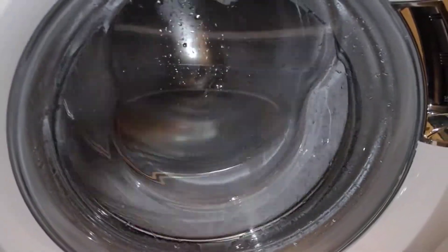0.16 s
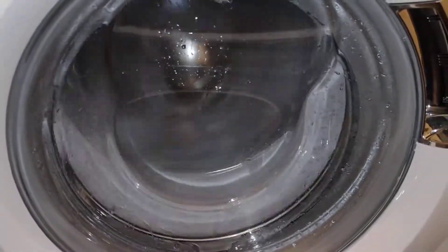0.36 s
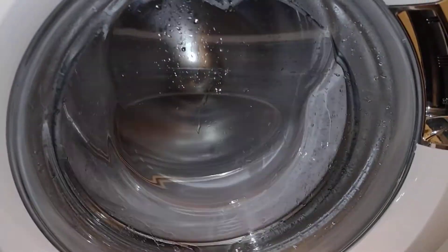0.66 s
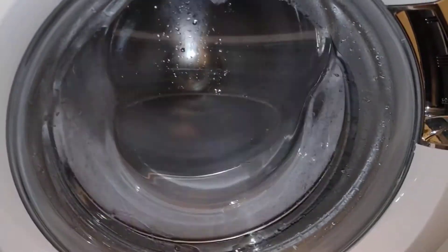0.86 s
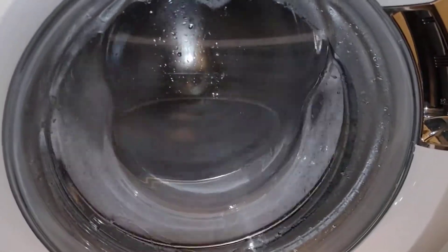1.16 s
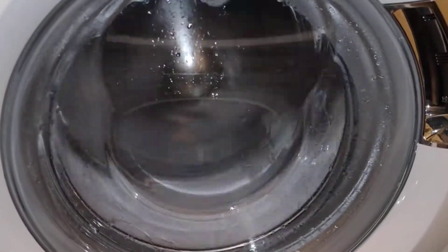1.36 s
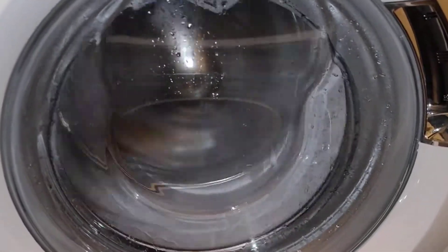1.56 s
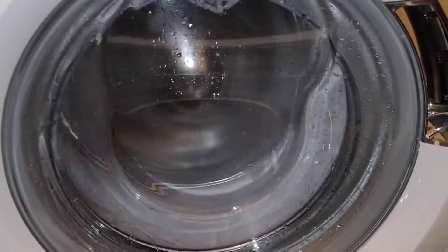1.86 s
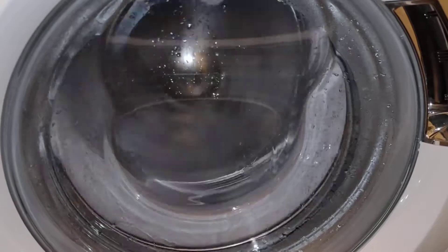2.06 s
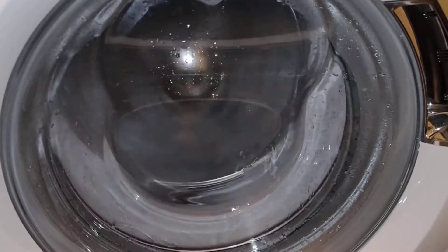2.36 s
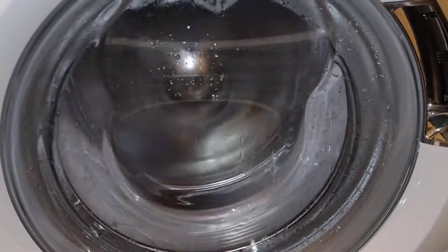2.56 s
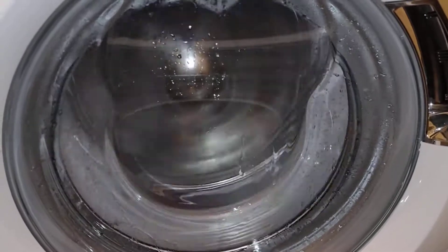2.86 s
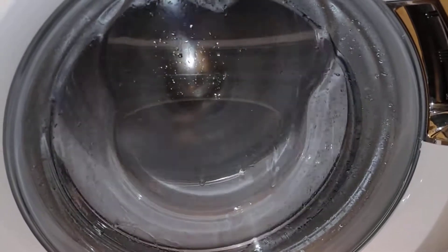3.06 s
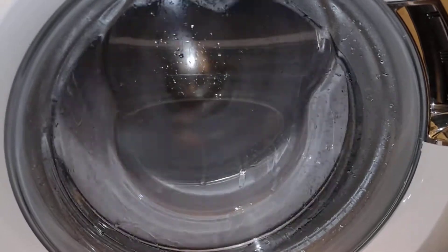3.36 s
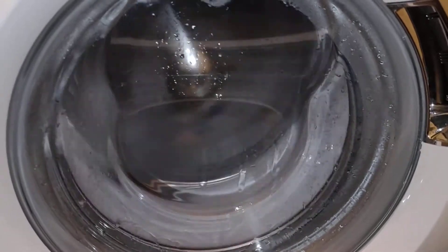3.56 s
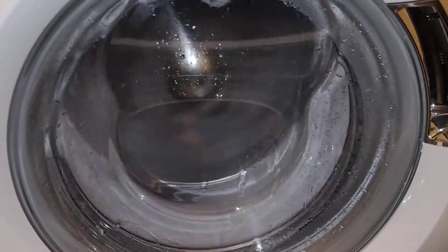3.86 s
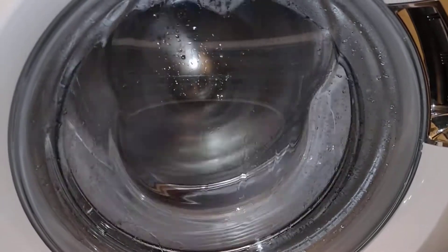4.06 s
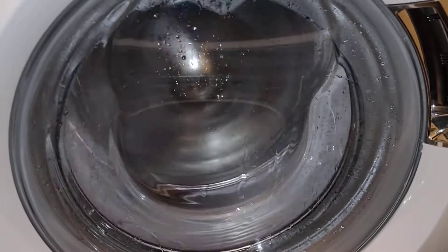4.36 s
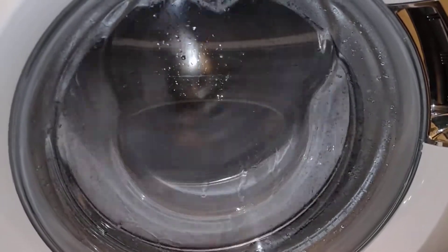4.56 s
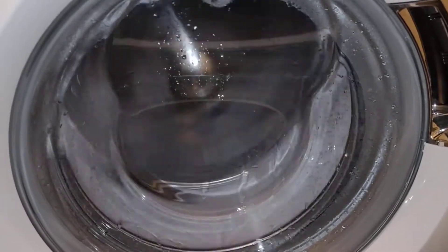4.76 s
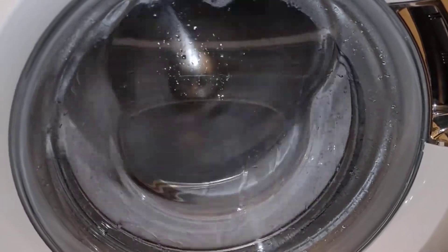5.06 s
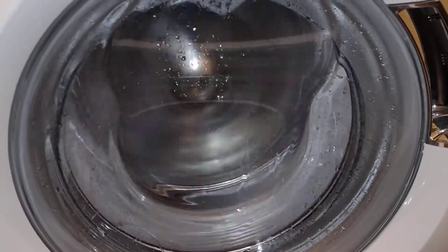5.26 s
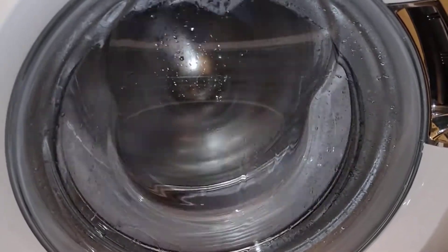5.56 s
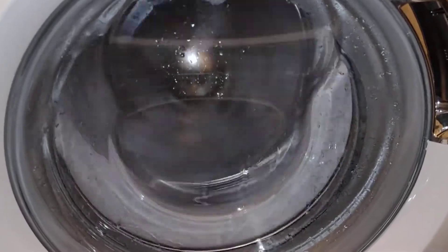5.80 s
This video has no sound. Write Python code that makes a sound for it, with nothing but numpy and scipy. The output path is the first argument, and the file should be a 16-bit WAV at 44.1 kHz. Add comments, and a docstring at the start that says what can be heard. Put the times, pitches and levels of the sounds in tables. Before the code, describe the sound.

A front-loading washing machine's motor whine climbs to a spin, overshoots slightly and holds, over low rumble, rapid drum throb and growing water spray.

```python
"""Washing machine reaching its spin

A washing machine runs up to a 400 rpm spin, overshoots a little and settles. Its brush motor whines as sums of
sine waves and hisses as coloured noise; the unbalanced load makes the pitch wobble once a turn, thumps the tub
and swishes. Most sounds grow with speed; drum and cabinet drone, rumble and boom, and the mains hums.
As the laundry lets go of its water, the spray (noise and ringing drops) grows and its surges get more even.
Now and then water sloshes or the load knocks and thuds."""
import sys
import numpy as np
from scipy import signal
from scipy.fft import rfft, irfft, next_fast_len
from scipy.io import wavfile
from scipy.ndimage import uniform_filter1d

SR = 44100
rng = np.random.default_rng(int(sys.argv[2]) if len(sys.argv) > 2 else 0)


def to_wav(s):
    """Save 16-bit WAV."""
    ch = np.atleast_2d(s).T  # columns
    pcm = np.round(np.clip(ch, -1, 1) * 32767)  # PCM
    wavfile.write(sys.argv[1], SR, pcm.astype(np.int16))


N = 261513

# In every table of resonances and nulls the lift is halved one width away from the centre.
# In every noise colour only the shape counts: the noise is scaled to rms 1 afterwards.

# two opposite shoves a turn: multiple of the drum rate, level/dB
THUMP = [(5, -38), (7, -16), (9, -1), (11, -5), (13, -15.5)]
# drum and bearing tones: multiple of the drum rate, level/dB
DRONE = [(19, -13), (20, -23), (21, -25), (22, -19), (23, -23), (24, -17), (26, -22.5), (27, -12),
         (33, -15.5), (36, -20.5), (38, -22), (45, -19), (48, -21), (50, -16.5)]
# chopped mains current in the motor: f/Hz, level/dB (before HUM_LAW)
HUM = [(100, -17), (200, -16.5), (300, -12), (400, -23)]
# its higher lines at the hardest pull: f/Hz, level/dB
PULL_BUZZ = [(500, -44), (600, -51), (700, -54), (900, -54)]
# noise colours: f/Hz, relative level per Hz/dB
RUMBLE = [(20, -38), (35, -19), (55, -2), (95, 3.5), (130, 9.5), (180, 4.5), (215, 1.5), (285, 5.5),
          (335, 4.5), (360, -37), (600, -76)]
SWISH = [(200, -17), (380, -5), (440, -0.5), (560, -4), (670, -6.5), (780, 1.5), (900, -2), (1000, -6.5),
         (1270, -9.5), (1520, -27), (2000, -20), (2500, -23), (3300, -46)]
SPRAY = [(900, 8), (1300, 15.5), (1520, -3), (1700, 9), (1950, 7.5), (2300, 7.5), (2800, 13), (3300, 3),
         (4300, 9), (6000, -10), (15000, -22)]
BRUSH = [(1500, 1.5), (2400, 1), (3400, -61), (4500, -18), (5400, 11), (6050, -3.5), (6700, 7.5),
         (7800, 11.5), (8600, 7.5), (9700, 13.5), (10700, 13), (11800, 4.5), (13300, 12.5), (14700, 2),
         (15700, -7)]
# how alike the noise is at the two ears: f/Hz, correlation (-1 to 1)
LIKENESS = [(110, 1), (150, 0.4), (300, 0.9), (600, 0.36), (1200, -0.13), (4000, 0), (15000, -0.11)]
# left against right for the noise: f/Hz, level/dB
BALANCE = [(40, -5), (150, -3.5), (320, -6.5), (420, 4.5), (900, -3), (2000, 1.5), (14000, -0.5)]
# commutator overtones: multiple of the slot rate, level/dB (before BAR_LAW)
BAR_TONES = [(6, -7), (8, -9.5), (10, -12.5), (12, -16), (14, -14)]
# rotor slot tones: multiple of the slot rate, level/dB (before SLOT_LAW)
SLOT_TONES = [(3, -23), (5, -7), (7, -10), (9, -11.5), (11, -11), (13, -12)]
# resonances and nulls of the motor housing: f/Hz, width/Hz, lift/dB
HOUSING = [(3230, 150, 12.5), (4027, 18, 15), (5810, 470, -1), (8110, 30, -1), (9300, 2300, 7),
           (9270, 57, 2.5), (10540, 30, -2), (10700, 31, 0.5)]
# rough low tones of the motor bearings: multiple of the motor rate, level/dB (at set speed)
GROWL = [(6, -50), (7, -56)]
# booms of the cabinet panels: f/Hz, width/Hz, lift/dB
PANEL = [(136.4, 1.1, 10), (161.7, 2.5, 7)]
# cabinet resonances and nulls that the main whine and its octave pass: f/Hz, width/Hz, lift/dB
WHINE_PEAKS = [(2190, 35, 4), (2525, 54, 7.5), (2586, 14, -3), (2685, 66, 6.3)]
OCTAVE_PEAKS = [(4280, 170, 4.9), (5247, 33, 4.2), (5286, 108, 6.9)]
# standing waves move the main whine between the ears as its pitch changes: f/Hz, left-right level/dB
WHINE_PAN = [(2200, 3), (2320, -3), (2500, -2.5), (2560, -5.5), (2625, -5.6), (2685, 2.4)]
# brush hiss over time: t/s, level/dB (before BRUSH_LAW)
HISS_LEVEL = [(0, 5), (0.35, -6), (0.65, 2.5), (0.7, -1), (1.25, -0.5), (1.55, 0.5), (3.12, 0.8), (3.35, 1),
              (5.9, 0.5)]
# water sloshes in the tub: t/s, time to fade to 37 % of the lift/s, swish lift/dB, spray lift/dB
SLOSHES = [(1.076, 0.053, 2.5, 2), (1.956, 0.03, 5, 2), (2.774, 0.028, 3.5, 3), (2.925, 0.33, 2, 3.5),
           (3.25, 0.033, 0.5, 3), (3.395, 0.051, 3, -0.5), (3.642, 0.033, 0.5, 6.5),
           (4.288, 0.11, -2.5, 1.5)]
# resonances and nulls of the cabinet that colour the rumble and the thuds: f/Hz, width/Hz, lift/dB
CABINET_MODES = [(151, 3.5, -17), (251.5, 5.2, 4.5), (291, 5.3, 4.5), (352, 5.7, -0.5)]
# resonances and nulls of the drum and tub, which colour the laundry, spray and knocks: f/Hz, width/Hz, lift/dB
TUB_MODES = [(388, 8.2, 5.5), (432, 5, 3), (525, 22, 3), (613.5, 5.8, 9.5), (789, 10, 3), (882, 8.1, 6.5),
             (1090, 4.7, -7), (1147, 7.2, 6.5), (1200, 15, -4), (1268, 16, 2), (1427, 20, 10.5),
             (1707, 20, 7.5)]
# colour of the boom of a side panel: f/Hz, relative level per Hz/dB
BOOM = [(40, -55), (90, -23), (125, -7), (150, 10.5), (172, 3), (210, -43.5), (500, -75)]
# that boom over time, strongest while the wet load is brought up to speed: t/s, level/dB
BOOM_LEVEL = [(0, -48), (0.5, -44), (0.77, -31.5), (0.9, -39), (1.17, -34), (1.45, -42), (1.63, -38),
              (1.8, -49), (3.1, -55), (3.85, -38), (5.9, -44)]
# the load knocks harder against the drum: t/s, level/dB (before the rise and decay)
KNOCKS = [(1.485, -30.5), (4.145, -25.5), (4.188, -41)]
# colour of a knock: f/Hz, relative level per Hz/dB
KNOCK = [(40, -45), (200, -16), (330, -3), (520, -0.5), (720, -2), (900, 2.5), (1300, -15), (2500, -43),
         (5000, -55)]
# the wet load thuds softly on some turns: t/s, level/dB
THUDS = [(0.22, -34), (0.36, -34), (0.82, -37), (0.9, -45), (1.05, -36), (1.21, -39), (1.35, -41),
         (1.52, -32), (1.8, -39), (1.95, -31.5), (2.12, -41)]
# colour of a thud: f/Hz, relative level per Hz/dB
THUD = [(150, -21), (240, -2), (325, 4), (370, -25), (600, -50)]
# brief dips of all drum and laundry sounds: t/s, time to fade to 37 % of the dip/s, level/dB
LULLS = [(0.142, 0.062, -3.5), (0.46, 0.021, -0.5), (1.43, 0.02, -3), (2.984, 0.07, -0.5)]

# level laws: level at set speed/dB, power of speed that the amplitude follows, change as the water leaves/dB
HUM_LAW = (-37, 0.6, 7.8)
THUMP_LAW = (-41.5, 5.5, -1.5)
DRONE_LAW = (-36.3, 3, 1.3)
RUMBLE_LAW = (-36.5, 0.78, 0.45)
SWISH_LAW = (-37.5, 4, 2.7)
SPRAY_LAW = (-48, 1, 7.55)
BRUSH_LAW = (-36, 1, 0)
WHINE_LAW = (-36, 1, -0.062)
OCTAVE_LAW = (-45, 0.16, 0.35)
BAR_LAW = (-33, 0.66, 1)
SLOT_LAW = (-38.5, 3.3, 0)
# the tub sways on its springs at one drum rate: f/Hz, width/Hz, lift/dB
SWAY = (6.67, 0.29, 2.9)

SLOTS, BELT_RATIO = 18, 196 / 18   # rotor slots, motor turns per drum turn
CUTOFF_HZ = 15800
ROOM_T60_S = 0.4   # time for the reflections to fall by 60 dB
# the speed control closes in on its set speed as a damped swing (motor turns per s)
SET_SPEED, SPEED_SWING = 72.68, 14.55
# when the set speed is first reached, period of the swing, its time constant
REACHED_S, HUNT_PERIOD_S, SETTLE_S = 1.2061, 5.1974, 1.0841
# share by which the motor speeds up and slows on each drum turn
WOBBLE = 0.0031
# the laundry lets go of its water: start, rise time of the spray, time to drain
RELEASE_S, SPRAY_RISE_S, DRAIN_S = 2.37, 0.15, 1.76
# the heavy side of the load comes round: when (part of a turn), rise and decay (turns)
LUNGE_AT, LUNGE_RISE, LUNGE_DECAY = 0.11, 0.19, 0.24
# the swish: its surge on each turn once drained, its random patter
DRAINED_SURGE_DB, PATTER_DB = 1.4, 0.8
# the spray: its surge on each turn with a wet and a drained load, its random unevenness
WET_SPRAY_SURGE_DB, DRAINED_SPRAY_SURGE_DB, SPLASH_DB = 1.3, 0.6, 0.9
# ringing drops: pitch range, cycles to fall by 60 dB, how many at each ear, level against the spray noise
DROP_LOW_HZ, DROP_HIGH_HZ, DROP_CYCLES, DROPS_PER_S, DROP_DB = 1557, 2737, 240, 120, -9.5
KNOCK_RISE_S, KNOCK_DECAY_S = 0.01, 0.057
THUD_HALF_S = 0.023   # from the middle of a thud to 37 % of its height
# brush pressure: swing with each drum turn, random flicker
BRUSH_SWAY_DB, BRUSH_FLICKER_DB = 0.45, 0.3
# roughness of the whine (0-1): when coasting, and added at the hardest pull
COAST_ROUGH, PULL_ROUGH = 0.19, 0.26
# the resonances answer a change of pitch a little late
RING_LAG_S = 0.017


def from_db(db):
    """Decibels to gain."""
    return 10 ** (np.asarray(db) / 20)


def rms_one(x):
    """Scale to rms 1."""
    return x / np.sqrt(np.mean(x ** 2) + 1e-20)


def at_hz(points, hz):
    """Read a table between its points on a log-frequency axis."""
    f, value = np.transpose(points)
    return np.interp(np.log(np.maximum(hz, 1)), np.log(f), value)


def pan(left_db):
    """Left and right gains that keep the total power the same."""
    gains = from_db(np.array([[.5], [-.5]]) * left_db)
    return gains / np.sqrt(np.mean(gains ** 2, axis=0))


def ramp(start_s, length_s):
    """From 0 to 1 in a straight line."""
    return np.clip((np.arange(N) / SR - start_s) / length_s, 0, 1)


def swing(turns, peak_at):
    """One swing a turn, highest at the given part of the turn."""
    return np.cos(2 * np.pi * (turns - peak_at))


def drift(rate):
    """Slow random wandering with spread 1: noise smoothed twice at the given rate in Hz."""
    r = np.exp(-40 * np.pi * rate / SR)   # worked out at every 20th sample
    white = rng.standard_normal(N // 20 + 2002)
    slow = signal.lfilter([1], [1, -2 * r, r * r], white)[2000:]   # skip the filter's start
    return np.interp(np.arange(N) / 20, np.arange(len(slow)), rms_one(slow))


def resonance_db(hz, mode):
    """Lift (or cut, when negative) in dB near one resonance or null."""
    centre, width, db = mode
    return db / (1 + ((hz - centre) / width) ** 2)


def coloured(white, spectrum, modes=()):
    """Two unrelated noises become stereo noise with a colour, resonances and set likeness of the ears; rms 1."""
    size = next_fast_len(N, True)
    hz = np.arange(size // 2 + 1) * SR / size
    colour_db = at_hz(spectrum, hz) + sum(resonance_db(hz, mode) for mode in modes)
    mid, side = rfft(white, size) * from_db(colour_db)
    alike = np.clip(at_hz(LIKENESS, hz), -1, 1)
    ears = np.sqrt(1 + alike) * mid + np.sqrt(1 - alike) * side * [[1], [-1]]
    return rms_one(irfft(ears * pan(at_hz(BALANCE, hz)), size)[:, :N])


def rolling_noise(turns, repeat, size=4096):
    """Part of the noise is a rough track met again on every turn, the rest is new."""
    track = rng.standard_normal((2, size))
    again = np.array([np.interp(turns % 1 * size, np.arange(size), side) for side in track])
    again *= np.sqrt(size * turns[-1] / N)   # same power per Hz as the new part
    share = np.clip(repeat, 0, 1)
    return np.sqrt(share) * again + np.sqrt(1 - share) * rng.standard_normal((2, N))


def taps(per_s, spread_db):
    """Small random contacts of uneven strength, two unrelated streams; rms 1."""
    struck = rng.random((2, N)) < per_s / SR
    sign = rng.choice([-1, 1], (2, N))
    strength_db = spread_db * np.clip(rng.standard_normal((2, N)), -2, 2)
    return rms_one(struck * sign * from_db(strength_db))


def motor_speed():
    """Motor turns per second: a run-up, one overshoot, then a fading swing about the set speed."""
    t = np.arange(N) / SR
    hunting = np.sin(2 * np.pi * (t - REACHED_S) / HUNT_PERIOD_S)
    return SET_SPEED + SPEED_SWING * np.exp(-t / SETTLE_S) * hunting


def rotor_turns(speed, turns, jitter=0.0011):
    """Turns made by the rotor; the load speeds and slows it once a drum turn, with a little random jitter."""
    uneven = 1 + WOBBLE * swing(turns, peak_at=.27) + jitter * drift(rate=65.0)
    return np.cumsum(speed * uneven) / SR


def pull_of(speed):
    """How hard the motor pulls: 0 when it is not speeding up, 1 at the steepest run-up."""
    gain = np.maximum(np.gradient(speed), 0)
    return gain / gain.max()


def level(law, speed, drained):
    """Gain of a source: a power of the speed, shifted as the water leaves the laundry."""
    db, power, drained_db = law
    return from_db(db + drained_db * drained) * (speed / SET_SPEED) ** power


def hum():
    """The motor iron buzzes at multiples of twice the mains rate."""
    t = np.arange(N) / SR
    lines = sum(from_db(db) * np.sin(2 * np.pi * (hz * t + rng.random())) for hz, db in HUM)
    return np.sqrt(2) * lines * pan(left_db=-4)


def pull_buzz(speed, flutter_db=3):
    """While the motor pulls, the chopped current adds higher, unsteady lines to the hum."""
    t = np.arange(N) / SR

    def one_ear():
        """Every line with its own flutter and starting phase."""
        return sum(from_db(db + flutter_db * drift(rate=14)) * np.sin(2 * np.pi * (hz * t + rng.random()))
                   for hz, db in PULL_BUZZ)

    return pull_of(speed) * np.array([one_ear(), one_ear()])


def lulls():
    """Gain of the drum and laundry sounds, which dip briefly now and then."""
    t = np.arange(N) / SR
    return from_db(sum(db * np.exp(-((t - s) / half_s) ** 2) for s, half_s, db in LULLS))


def panel_boom(turns, throb_db=2):
    """A side panel gives a narrow, hollow boom that throbs with the load."""
    boom_db = np.interp(np.arange(N) / SR, *np.transpose(BOOM_LEVEL))
    boom_db = boom_db + throb_db * swing(turns, peak_at=0.45)
    return from_db(boom_db) * coloured(rolling_noise(turns, repeat=0.61), BOOM)


def thuds():
    """The wet load leans on the tub: soft, rounded thuds in the cabinet's upper boom."""
    t = np.arange(N) / SR
    force = sum(from_db(db) * np.exp(-((t - s) / THUD_HALF_S) ** 2) for s, db in THUDS)
    return force * coloured(rng.standard_normal((2, N)), THUD, CABINET_MODES)


def knocks():
    """Soft, cloth-covered blows: bursts of noise coloured by the tub."""
    force = 0
    for s, db in KNOCKS:
        since = np.maximum(np.arange(N) / SR - s, 0)
        force = force + from_db(db) * (1 - np.exp(-since / KNOCK_RISE_S)) * np.exp(-since / KNOCK_DECAY_S)
    return force * coloured(rng.standard_normal((2, N)), KNOCK, TUB_MODES)


def tub(speed, turns, drained, waver_db=2.0, surge_db=1.0, rebound_db=-0.2, grain_db=-4):
    """The load shoves the tub to and fro; drum and bearings drone and rumble through the cabinet."""
    drum_rate = speed / BELT_RATIO
    shoves = sum(from_db(db) * swing(k * (turns - .26), 0) for k, db in THUMP)
    thump = level(THUMP_LAW, speed, drained) * shoves
    drone = 0
    for k, db in DRONE:
        # a tone swells as it climbs through a panel's pitch
        boom_db = sum(resonance_db(k * drum_rate, mode) for mode in PANEL)
        tone_db = db + boom_db + waver_db * drift(rate=3.7)
        drone = drone + from_db(tone_db) * swing(k * turns, rng.random())
    drone = level(DRONE_LAW, speed, drained) * drone
    rolling = rolling_noise(turns, repeat=0.82) + from_db(grain_db) * taps(per_s=90, spread_db=4)
    rumble = level(RUMBLE_LAW, speed, drained) * coloured(rolling, RUMBLE, CABINET_MODES)
    load_db = resonance_db(drum_rate, SWAY) + surge_db * swing(turns, peak_at=0.28)
    load = from_db(load_db + rebound_db * swing(2 * turns, peak_at=0.38))
    return np.sqrt(2) * (thump + load * drone) * pan(left_db=-2.0) + load * rumble


def lunge(turns):
    """The heavy side comes round: a quick rise and a slower fall once a turn; mean 0, spread 1."""
    since = (turns - LUNGE_AT) % 1
    shape = (1 - np.exp(-since / LUNGE_RISE)) * np.exp(-since / LUNGE_DECAY)
    return rms_one(shape - shape.mean())


def drops(count=14):
    """Drops ring briefly at one of several pitches, in unrelated streams at the two ears; rms 1."""
    out = 0
    for hz in np.geomspace(DROP_LOW_HZ, DROP_HIGH_HZ, count):
        r = from_db(-60 * hz / DROP_CYCLES / SR)   # loss per sample
        w = 2 * np.pi * hz / SR
        falls = (rng.random(N) < DROPS_PER_S / count / SR) * rng.standard_normal((2, N))
        out = out + signal.lfilter([0, np.sin(w)], [1, -2 * r * np.cos(w), r * r], falls + 1e-18)
    return rms_one(out)


def laundry(speed, turns, drained, wet_surge_db=1.5, rattle_db=-3, drops_db=0):
    """Wet laundry swishes and rattles past once a turn, more evenly as it drains, and flings drops at the tub."""
    t = np.arange(N) / SR
    surge = lunge(turns)
    surge_db = wet_surge_db * (1 - drained) + DRAINED_SURGE_DB * drained
    spray_surge_db = WET_SPRAY_SURGE_DB * (1 - drained) + DRAINED_SPRAY_SURGE_DB * drained
    wash_db, gush_db = sum(np.outer(lifts_db, np.exp(-((t - s) / half_s) ** 2))
                           for s, half_s, *lifts_db in SLOSHES)
    rubbing = rolling_noise(turns, repeat=0.073) + from_db(rattle_db) * taps(per_s=220, spread_db=0.5)
    water = rng.standard_normal((2, N)) + from_db(drops_db) * taps(per_s=1300, spread_db=3.5)
    swish = level(SWISH_LAW, speed, drained) * coloured(rubbing, SWISH, TUB_MODES)
    released = ramp(RELEASE_S, SPRAY_RISE_S)
    wet_noise = coloured(water, SPRAY, TUB_MODES) + from_db(DROP_DB) * drops()
    spray = level(SPRAY_LAW, speed, released) * wet_noise
    swish_gain = from_db(surge_db * surge + wash_db + PATTER_DB * drift(rate=12))
    spray_gain = from_db(spray_surge_db * surge + gush_db + SPLASH_DB * drift(rate=16))
    return swish_gain * swish + spray_gain * spray


def bearings(speed, flutter_rate=14, speed_power=6):
    """Rolling balls growl in narrow bands that climb and swell with the motor."""
    angle = 2 * np.pi * np.cumsum(speed) / SR

    def band(k):
        """A tone made unsteady by two unrelated drifts."""
        return drift(flutter_rate) * np.cos(k * angle) + drift(flutter_rate) * np.sin(k * angle)

    growl = np.array([sum(from_db(db) * band(k) for k, db in GROWL) for ear in range(2)])
    return (speed / SET_SPEED) ** speed_power * growl


def brushes(speed, turns, rotor, drained, rub_db=1.0):
    """Carbon brushes hiss on the commutator; its worn bars return on every motor turn and add a fine buzz."""
    hiss_db = np.interp(np.arange(N) / SR, *np.transpose(HISS_LEVEL))
    sway_db = rub_db * swing(rotor, 0) + BRUSH_SWAY_DB * swing(turns, peak_at=0)
    pressure_db = hiss_db + sway_db + BRUSH_FLICKER_DB * drift(rate=22)
    hiss = coloured(rolling_noise(rotor, repeat=0.54, size=600), BRUSH)
    return level(BRUSH_LAW, speed, drained) * from_db(pressure_db) * hiss


def room_response():
    """Spectrum of a short diffuse tail for each ear."""
    t = np.arange(SR // 4) / SR
    tail = rng.standard_normal((2, len(t))) * from_db(-60 * t / ROOM_T60_S)
    return rfft(tail, next_fast_len(N + len(t), True))


def in_room(tone, room, share):
    """Reflections turn a wavering pitch into a fluttering level, different at each ear; slow level 1."""
    size = 2 * (room.shape[1] - 1)
    echoes = rms_one(irfft(rfft(tone, size) * room)[:, :N])
    share = np.clip(share, 0, 1)
    heard = np.sqrt(1 - share) * rms_one(tone) + np.sqrt(share) * echoes
    return heard / np.sqrt(uniform_filter1d(heard ** 2, size=SR // 3) + 1e-9)


def whine(speed, rotor, drained, mains_ripple=0.018, ear_lag=0.3):
    """Rotor slots and twice as many commutator bars sing, rougher while the motor pulls."""
    strain = COAST_ROUGH + PULL_ROUGH * pull_of(speed) ** 2
    slot_angle = 2 * np.pi * SLOTS * rotor
    ears = np.array([[0], [2 * np.pi * ear_lag]])   # the ears lie part of a cycle apart
    chatter, slip = drift(rate=90), 2 * drift(rate=35)
    room = room_response()
    t = np.arange(N) / SR
    # the wobble swings each tone in and out of a sharp resonance
    slot_hz = np.interp(t - RING_LAG_S, t, SLOTS * np.gradient(rotor) * SR)

    def tone(order, share, peaks):
        """One partial: roughened by strain, lifted or cut by resonances and nulls, heard with reflections."""
        angle = order * slot_angle + ears
        source = np.sin(angle) + strain * chatter * np.sin(angle + slip)
        lift_db = sum(resonance_db(order * slot_hz, mode) for mode in peaks)
        return from_db(lift_db) * in_room(source, room, share)

    # the main whine and its octave reach the ears more directly and stay steadier; the other tones flutter
    main, octave = tone(2, .2, WHINE_PEAKS), tone(4, .3, OCTAVE_PEAKS)
    main = level(WHINE_LAW, speed, drained) * pan(at_hz(WHINE_PAN, 2 * SLOTS * speed)) * main
    octave = level(OCTAVE_LAW, speed, drained) * pan(left_db=-5.0) * octave
    bars = sum(from_db(db) * tone(k, 0.96, HOUSING) for k, db in BAR_TONES)
    bars = level(BAR_LAW, speed, drained) * bars
    slots = sum(from_db(db) * tone(k, 1.0, HOUSING) for k, db in SLOT_TONES)
    slots = level(SLOT_LAW, speed, drained) * slots
    torque = 1 + mains_ripple * np.cos(2 * np.pi * 100 * t)   # pulses at twice the mains rate
    return (main + octave + bars + slots) * torque


def scene():
    """The motor turns the drum through a belt, so one speed drives both."""
    speed, drained = motor_speed(), ramp(RELEASE_S, DRAIN_S)
    turns = np.cumsum(speed) / SR / BELT_RATIO   # turns made by the drum
    rotor = rotor_turns(speed, turns)
    mains = level(HUM_LAW, speed, drained) * hum() + pull_buzz(speed)
    drum = tub(speed, turns, drained) + panel_boom(turns) + laundry(speed, turns, drained)
    blows = thuds() + knocks()
    motor = bearings(speed) + brushes(speed, turns, rotor, drained) + whine(speed, rotor, drained)
    return mains + lulls() * drum + blows + motor


def record(dry):
    """A steep low-pass filter cuts the top."""
    return signal.sosfilt(signal.ellip(12, .1, 90, CUTOFF_HZ, fs=SR, output="sos"), dry)


dry = scene()
out = record(dry)
to_wav(out)
```